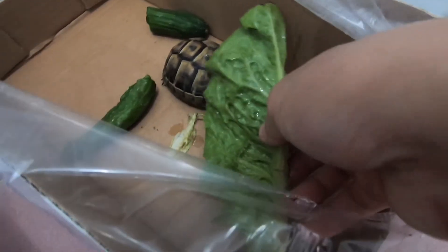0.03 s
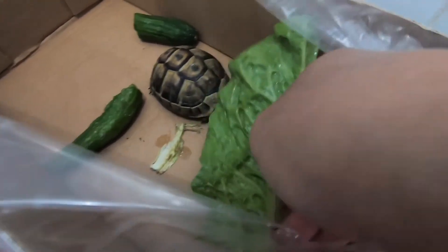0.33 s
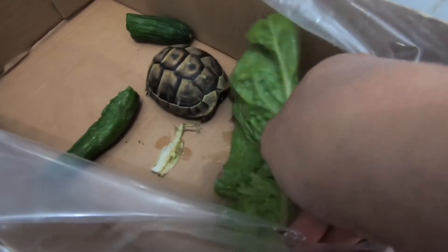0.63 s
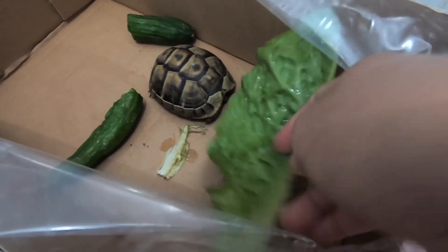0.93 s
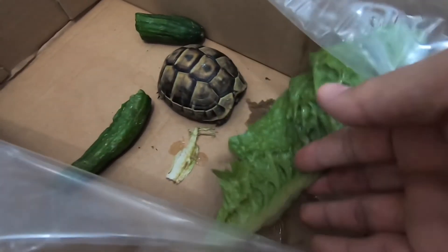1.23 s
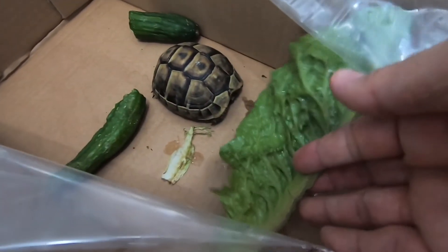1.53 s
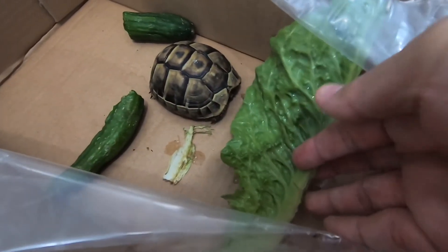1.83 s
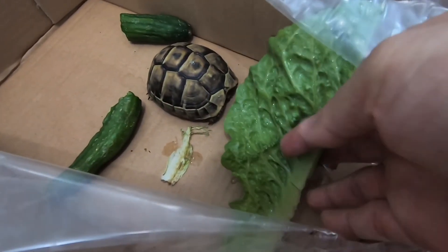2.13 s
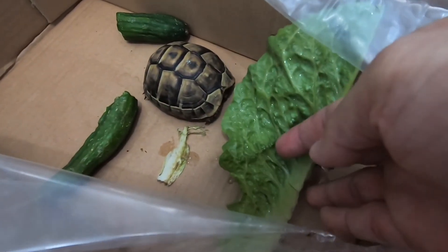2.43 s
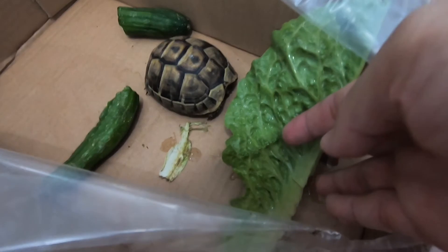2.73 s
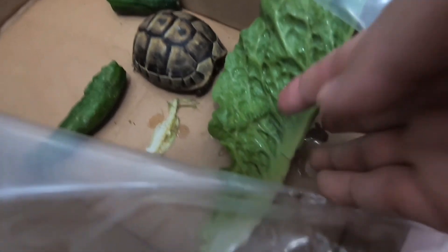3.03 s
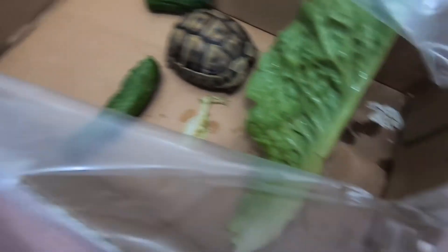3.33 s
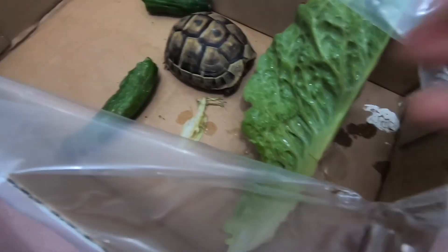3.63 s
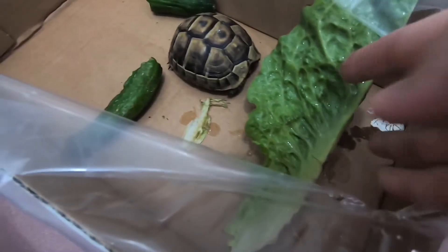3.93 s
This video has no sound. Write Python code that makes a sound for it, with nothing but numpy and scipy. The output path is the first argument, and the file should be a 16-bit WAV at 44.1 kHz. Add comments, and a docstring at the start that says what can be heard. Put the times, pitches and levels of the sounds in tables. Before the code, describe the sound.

Thin plastic sheeting crinkles close to the microphone as a lettuce leaf slides into a cardboard box, with crisp snaps and two soft bumps. The rustle thins out, then briefly returns, over a low, throbbing motor hum indoors.

```python
"""Thin plastic sheeting crinkles up close, over the throbbing hum of two motors running slightly out of step.
A hand is sliding a lettuce leaf under the sheeting into a cardboard box. Tiny folds buckle, creases and
leaf snap against the box, the damp leaf squeaks, and the cardboard gives two soft, hollow bumps.
Once the leaf lies still, only the film slides, with a thinner rustle."""
import sys
import numpy as np
from scipy import signal
from scipy.fft import rfft, irfft, next_fast_len
from scipy.io import wavfile
from scipy.ndimage import uniform_filter1d, map_coordinates

SR = 44100
rng = np.random.default_rng(int(sys.argv[2]) if len(sys.argv) > 2 else 0)


def generate_wav(sig):
    """Save sig (samples, or channels by samples) to the path in sys.argv[1] as 16-bit PCM at SR."""
    pcm = np.round(np.clip(np.atleast_2d(sig).T, -1, 1) * 32767).astype(np.int16)
    wavfile.write(sys.argv[1], SR, pcm)


N = 176400

# fader moves of the rustle, ahead of the layer trims: time_s, middle_db, treble_db
RUSTLE_FADERS = [(0, -58, -57.5), (0.14, -48.5, -57), (0.2, -56, -53.5), (0.279, -45, -44),
                 (0.35, -50, -54), (0.41, -46.5, -47.5), (0.481, -52, -49.5), (0.539, -56, -59),
                 (0.564, -55.5, -63), (0.601, -41, -45), (0.7, -57, -58), (0.768, -46.5, -51),
                 (0.85, -56.5, -61), (0.93, -51.5, -53), (1.152, -43.5, -43.5), (1.272, -56, -63),
                 (1.4, -54.5, -61.5), (1.5, -63, -65.5), (1.55, -53.5, -51), (1.78, -56.5, -63.5),
                 (1.921, -62, -62.5), (1.929, -48.5, -49.5), (2, -50, -56), (2.101, -66.5, -76),
                 (2.26, -64, -69), (2.329, -73, -81), (2.36, -61, -64.5), (2.44, -72, -79),
                 (2.52, -65.5, -70), (2.6, -71, -74), (2.68, -62.5, -56.5), (2.77, -72, -73),
                 (2.83, -62.5, -61.5), (2.95, -65, -60), (3.03, -58, -48), (3.13, -64, -62),
                 (3.2, -71, -70), (3.279, -66, -55), (3.52, -98, -100.5), (3.71, -71.5, -65),
                 (3.745, -55.5, -50), (4, -58.5, -56.5)]
# EQ curves of the rustle's layers: frequency_hz, gain_db
BOX_EQ = [(150, -35.5), (330, -4.5), (750, -2), (1600, -14.5), (5000, -80.5)]
MIDDLE_EQ = [(700, -12.5), (1300, -4.5), (1900, -3), (2500, 0.5), (3400, -2.5), (4600, -7.5), (5600, -17),
             (12000, -64)]
TREBLE_EQ = [(2000, -66), (4800, -16), (6300, -7.5), (7700, -6.5), (8800, -15), (10000, -16.5),
             (11200, -28), (15500, -36)]
FILM_ONLY_EQ = [(1900, -30), (2550, -5), (2850, -19), (3400, -4), (4600, -16.5), (7600, -2), (8900, -14),
                (15500, -42)]  # the treble once the leaf lies still
# stereo image of the rustle and the room tone: frequency_hz, left_right_likeness (1 is mono)
RUSTLE_IMAGE = [(300, 0.8), (1000, 0.73), (14000, 0.11)]
ROOM_IMAGE = [(150, 1), (380, 0.95), (950, 0.27)]
# partials of the first motor: harmonic_number, level_db
MOTOR_PARTIALS = [(1, -31), (2, -43), (3, -46.5), (5, -66)]
# fainter lines in the hum: pitch_hz, level_db
HUM_LINES = [(48.6, -52.5), (131.8, -38.5), (330, -58)]
# EQ curves of the machines' drone and moving air: frequency_hz, gain_db
DRONE_EQ = [(15, -23.5), (40, -8), (88, -4), (102, 3.5), (120, -0.5), (133, 6.5), (146, -0.5), (174, -16),
            (192, -3.5), (212, -16.5), (300, -18), (1500, -120)]
AIR_EQ = [(200, 2.5), (380, 2.5), (720, 8), (1100, -3), (1800, -18), (8000, -36), (15500, -67)]
# snaps of sheeting and leaf, ahead of their trim: start_s, length_ms, body_db, middle_db, treble_db
SNAP_CUES = [(0.015, 2.1, -40, -36.5, -66), (0.0246, 1.5, -51, -40, -40), (0.0796, 5.9, -37, -40, -48),
             (0.2552, 2.5, -35, -35.5, -30), (0.264, 2, -27.5, -29.5, -31.5), (0.338, 2, -61, -64, -52),
             (0.388, 4.2, -36, -50, -46), (0.395, 2, -45, -43, -44), (0.413, 2.8, -49, -46, -43.5),
             (0.4355, 2, -34, -35.5, -62), (0.5761, 2.6, -33, -31, -40), (0.6693, 7.5, -33, -36, -40),
             (0.712, 2.5, -41.5, -48, -45.5), (0.887, 3, -60, -59, -48.5), (0.961, 4, -37.5, -37.5, -43),
             (1.062, 2.1, -43, -35.5, -38), (1.2013, 1.2, -51, -44, -45.5), (1.292, 1.3, -46, -40, -43),
             (1.3181, 1.4, -53, -48, -47.5), (1.45, 3.9, -41, -57, -78), (1.486, 2, -55, -48, -63),
             (1.5356, 3.4, -34, -27.5, -33.5), (1.609, 2.5, -34, -32, -34), (2.1522, 4.1, -43, -53.5, -62),
             (2.68, 1.2, -55, -48.5, -66), (2.9981, 1.6, -62, -56, -47), (3.098, 9.6, -62, -52, -45),
             (3.1463, 2.3, -46, -43, -62), (3.158, 1.5, -45.5, -46.5, -72),
             (3.2568, 3.5, -62, -51.5, -49.5), (3.2857, 5.4, -48, -56, -49),
             (3.729, 9.3, -34.5, -35.5, -37.5), (3.7777, 3.3, -45, -38, -63), (3.7846, 4.5, -35, -39, -44),
             (3.801, 2.1, -51, -40, -51)]
# a snap's body, middle and treble bands, then its thin top edge: low_hz, high_hz
SNAP_BANDS_HZ = [(420, 1346), (2100, 4470), (4700, 7610)]
EDGE_BAND_HZ = (9600, 12400)
# time the room takes to die by 60 dB: frequency_hz, decay_s
ROOM_DECAY = [(300, 0.87), (9000, 0.17)]
# squeaks of the damp leaf: peak_s, half_length_s, low_hz, low_db, high_hz, high_db
SQUEAK_CUES = [(0.106, 0.013, 820, -45, 1715, -44.5), (0.153, 0.011, 880, -42, 2560, -40.5),
               (0.69, 0.024, 1040, -45, 2860, -49.5)]
# soft bumps on the cardboard: start_s, pitch_hz, level_db
BUMP_CUES = [(1.536, 272, -36.5), (3.824, 443, -35.5)]

CRINKLES_PER_S, CRINKLE_SPREAD_DB, HISS_SHARE = 2200, 2, 0.47
BUCKLES_PER_S, BUCKLE_HZ, BUCKLE_SPREAD_OCTAVES, BUCKLE_DECAY_CYCLES = 260, 5740, 0.88, 1.2
BUCKLE_DB, BEND_DB, FLUTTER_DB, LEAF_LIES_S = -11, 2.5, 1.73, 2.2
BOX_DB, BOX_FOLLOWS = -54, 0.53  # the box follows a share of the rustle's swings
MIDDLE_TRIM_DB, TREBLE_TRIM_DB = -2, -5.5
MOTOR_HZ, BEAT_HZ, IN_STEP_S = 59.35, 2.66, 0.16  # at IN_STEP_S both motors push together
SECOND_MOTOR_DB, DRONE_DB, AIR_DB = -35.5, -32.5, -54
SNAP_TRIM_DB, SNAP_WIDTH, SNAP_REF_S = 1, 0.4, 0.0028  # a snap's level is its energy over SNAP_REF_S
SNAP_FALL_DB, BOX_RING_DB, BOX_RING_S = 9, -32, 0.02  # fall over a snap's length, then the box's ring
EDGE_TRIM_DB, EDGE_GROWTH = -5, 1.39  # the top edge grows faster than the treble
SQUEAK_Q = 5
BUMP_Q, BUMP_RISE_S, BUMP_FALL_S = 2.4, 0.0027, 0.022
REVERB_DB, BALANCE_DB, HIGH_CUT_HZ = -12.5, -1.2, 15600


def amp(db):
    """Decibels to gain."""
    return 10 ** (np.asarray(db) / 20)


def unit(x):
    """Scale to rms 1."""
    return x / np.sqrt(np.mean(x ** 2) + 1e-20)


def curve_at(points, hz):
    """Read a curve on a log frequency axis."""
    knots_hz, values = np.transpose(points)
    return np.interp(np.log(hz + 1), np.log(knots_hz + 1), values)


def wobble(knots_per_s):
    """A smooth random drift."""
    knots = rng.standard_normal(int(N * knots_per_s / SR) + 4)
    return map_coordinates(knots, [np.arange(N) * knots_per_s / SR])


def filtered(x, response):
    """EQ x with a gain given as a function of frequency."""
    size = next_fast_len(N + SR // 2)
    return irfft(rfft(x, size) * response(np.fft.rfftfreq(size, 1 / SR)), size)[..., :N]


def stereo(pair, eq, image):
    """EQ two unrelated signals and spread them to left and right as mid and side."""
    def response(hz):
        angle = np.arccos(np.clip(curve_at(image, hz), -1, 1)) / 2
        return amp(curve_at(eq, hz)) * [np.cos(angle), np.sin(angle)]
    mid, side = filtered(pair, response)
    return np.array([mid + side, mid - side]) / np.std(mid)


def resonance(hz, q):
    """Noise ringing roughly around one pitch, at rms 1."""
    return unit(filtered(rng.standard_normal(N), lambda f: 1 / (1 + (q * (f / hz - hz / (f + 1))) ** 2)))


def crinkles():
    """Tiny clicks of uneven size over the smooth hiss of sliding film."""
    fires = rng.random((2, N)) < CRINKLES_PER_S / SR
    sizes = amp(CRINKLE_SPREAD_DB * np.minimum(rng.exponential(size=(2, N)), 5))
    clicks = unit(fires * sizes * rng.choice([-1, 1], (2, N)))
    return np.sqrt(1 - HISS_SHARE) * clicks + np.sqrt(HISS_SHARE) * rng.standard_normal((2, N))


def bending_film(pair):
    """Resonances come and go at random as the film bends."""
    spectrum = signal.stft(pair, nperseg=512)[2]
    patches = uniform_filter1d(rng.standard_normal(spectrum.shape[1:]), size=4, axis=0)  # across pitch
    patches = uniform_filter1d(patches, size=12, axis=1)  # across time
    return unit(signal.istft(spectrum * amp(BEND_DB * unit(patches)), nperseg=512)[1][:, :N])


def buckles():
    """Small folds give way one by one, each a dry tick with a pitch of its own."""
    when, size, pitch, phase = rng.random((int(BUCKLES_PER_S * N / SR), 4)).T[..., None]
    age = np.arange(SR // 200)
    cycles = BUCKLE_HZ * 2 ** (BUCKLE_SPREAD_OCTAVES * (2 * pitch - 1)) * age / SR
    decay = size ** 2 * np.exp(-cycles / BUCKLE_DECAY_CYCLES)
    samples = (when * N).astype(int) + age
    pair = [decay * np.sin(2 * np.pi * (cycles + shift)) for shift in (0, phase)]
    return unit(np.array([np.bincount(samples.ravel(), ticks.ravel(), N)[:N] for ticks in pair]))


def sheeting_rustle():
    """The sheeting crinkles as the hand drags it; the box adds a hollow body."""
    t = np.arange(N) / SR
    times_s, *faders = np.transpose(RUSTLE_FADERS)
    middle_db, treble_db = [np.interp(t, times_s, fader) for fader in faders]
    settled = np.clip(2 * (t - LEAF_LIES_S) + .5, 0, 1)  # half-second crossfade to film alone
    grains = bending_film(crinkles()) + amp(BUCKLE_DB) * (1 - settled / 2) * buckles()
    grains *= amp(FLUTTER_DB * wobble(knots_per_s=70))
    box_db = BOX_DB + BOX_FOLLOWS * (middle_db - np.percentile(middle_db, 75))
    treble = amp(treble_db + TREBLE_TRIM_DB)
    layers = [(BOX_EQ, amp(box_db)), (MIDDLE_EQ, amp(middle_db + MIDDLE_TRIM_DB)),
              (TREBLE_EQ, treble * (1 - settled)), (FILM_ONLY_EQ, treble * settled)]
    return sum(gain * stereo(grains, eq, RUSTLE_IMAGE) for eq, gain in layers)


def motor_hum():
    """Two motors beat against each other over a few fainter, wavering lines."""
    phase_per_hz = 2 * np.pi * (np.arange(N) / SR - IN_STEP_S)
    first = sum(amp(db) * np.cos(round(k) * MOTOR_HZ * phase_per_hz + (k > 1) * rng.uniform(0, 2 * np.pi))
                for k, db in MOTOR_PARTIALS)
    second = amp(SECOND_MOTOR_DB) * np.cos((MOTOR_HZ + BEAT_HZ) * phase_per_hz)
    lines = sum(amp(db) * np.cos(hz * phase_per_hz + rng.uniform(0, 2 * np.pi) + 0.33 * wobble(1.63))
                for hz, db in HUM_LINES)
    return np.sqrt(2) * (first + second + lines)


def room_tone():
    """A bed of low drone and faint moving air from the running machines."""
    drone, air = [stereo(rng.standard_normal((2, N)), eq, ROOM_IMAGE) for eq in (DRONE_EQ, AIR_EQ)]
    return amp(DRONE_DB) * drone + amp(AIR_DB) * air


def crease_snaps():
    """Each crease gives way in a burst of a few milliseconds and rings briefly in the box."""
    out, t = np.zeros((2, N + SR)), np.arange(SR // 16) / SR
    box_ring = amp(BOX_RING_DB) * np.exp(-t / BOX_RING_S)
    for start_s, length_ms, body_db, middle_db, treble_db in SNAP_CUES:
        envelope = amp(-SNAP_FALL_DB * t / (length_ms / 1000)) + box_ring
        burst = envelope * rng.standard_normal((2, len(t)))
        edge_db = EDGE_GROWTH * treble_db + EDGE_TRIM_DB
        for band, db in zip(SNAP_BANDS_HZ + [EDGE_BAND_HZ], (body_db, middle_db, treble_db, edge_db)):
            pair = signal.sosfilt(signal.butter(3, band, "bandpass", fs=SR, output="sos"), burst)
            mid, side = pair / np.linalg.norm(pair, axis=1, keepdims=True) * np.sqrt(SNAP_REF_S * SR)
            side *= SNAP_WIDTH * (2 if band[0] >= SNAP_BANDS_HZ[2][0] else 1)  # treble and edge sit wider
            snap = amp(db + SNAP_TRIM_DB) * np.array([mid + side, mid - side])
            out[:, round(start_s * SR):][:, :len(t)] += snap
    return out[:, :N]


def room_reverb(x):
    """A small room's tail, shorter in the treble."""
    hz, t, spectrum = signal.stft(rng.standard_normal((2, SR // 2)), SR, nperseg=256)
    decay = amp(-60 * t / curve_at(ROOM_DECAY, hz)[:, None])
    tail = signal.istft(spectrum * decay, SR, nperseg=256)[1]
    predelayed = np.pad(tail, ((0, 0), (SR // 300, 0))) / np.linalg.norm(tail[0])
    return signal.fftconvolve(x, predelayed, axes=1)[:, :N]


def leaf_squeaks():
    """The damp leaf sticks and slips on film and cardboard: brief swells in two narrow resonances."""
    out, t = np.zeros(N), np.arange(N) / SR
    for peak_s, half_length_s, low_hz, low_db, high_hz, high_db in SQUEAK_CUES:
        swell = np.exp(-2 * ((t - peak_s) / half_length_s) ** 2)
        for hz, db in (low_hz, low_db), (high_hz, high_db):
            out += amp(db) * np.std(swell) * unit(swell * resonance(hz, SQUEAK_Q))
    return out


def cardboard_bumps():
    """The cardboard answers a soft touch with a hollow, quickly damped note."""
    out = np.zeros(N)
    for start_s, hz, db in BUMP_CUES:
        age = np.maximum(np.arange(N) / SR - start_s, 0)
        envelope = (1 - np.exp(-age / BUMP_RISE_S)) * np.exp(-age / BUMP_FALL_S)
        out += amp(db) * envelope * resonance(hz, BUMP_Q)
    return out


def scene():
    """Dry rustle up front, a touch of room on the contacts, the hum behind; all leaning slightly right."""
    contacts = crease_snaps() + leaf_squeaks() + cardboard_bumps()
    mix = sheeting_rustle() + contacts + amp(REVERB_DB) * room_reverb(contacts) + motor_hum() + room_tone()
    return mix * amp([[BALANCE_DB / 2], [-BALANCE_DB / 2]])


def record(dry):
    """A steep high cut on the whole mix."""
    return signal.sosfilt(signal.ellip(10, .1, 80, HIGH_CUT_HZ, fs=SR, output="sos"), dry)


dry = scene()
out = record(dry)
generate_wav(out)
```